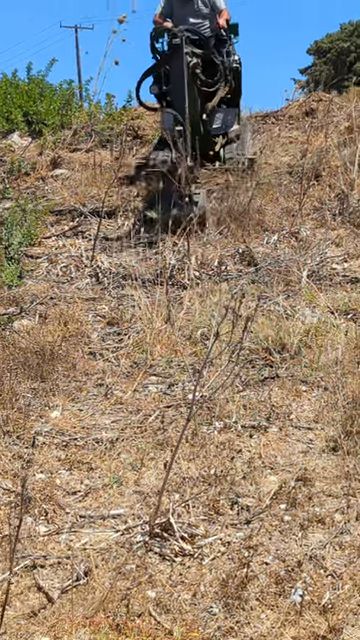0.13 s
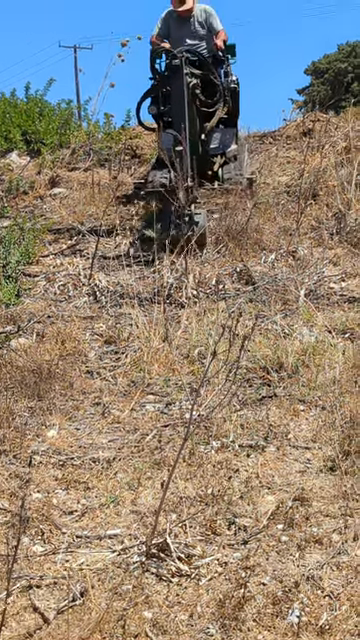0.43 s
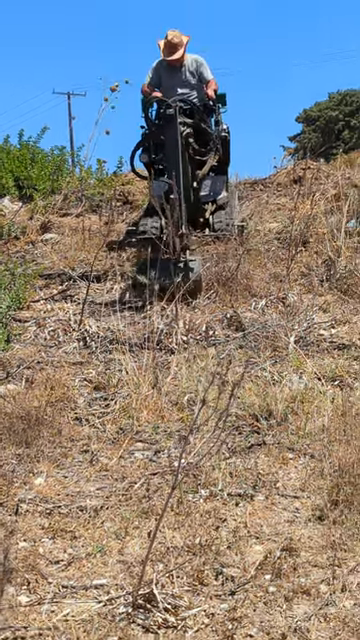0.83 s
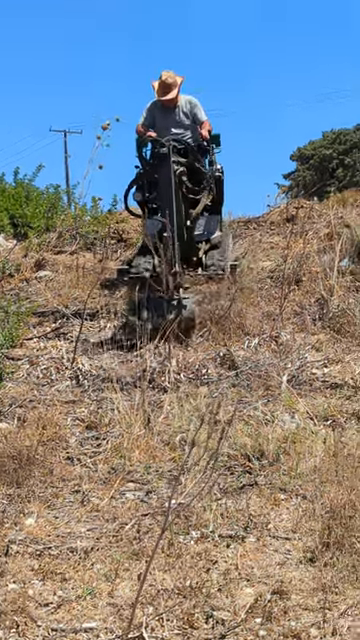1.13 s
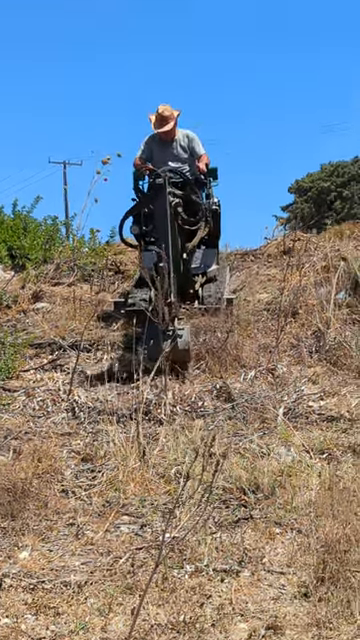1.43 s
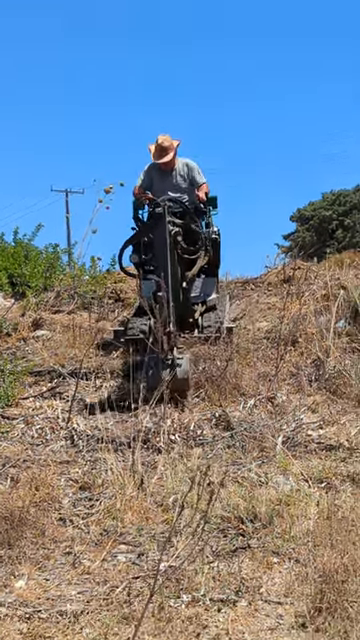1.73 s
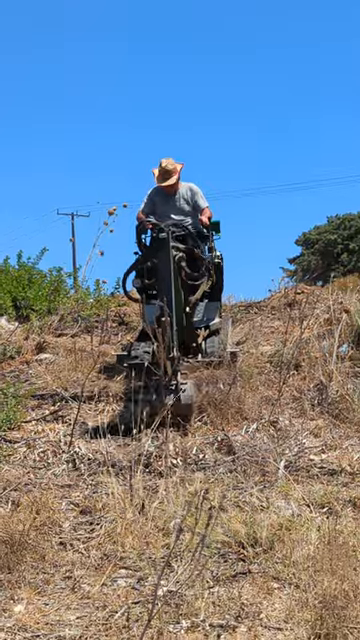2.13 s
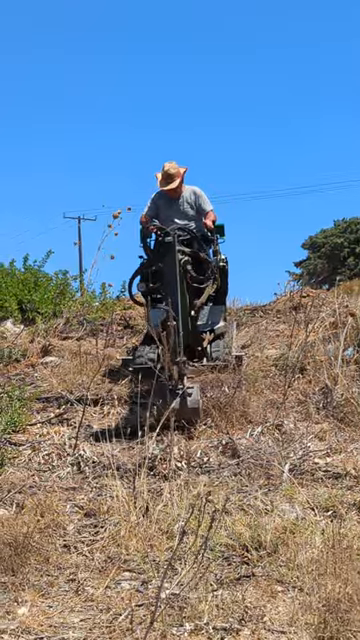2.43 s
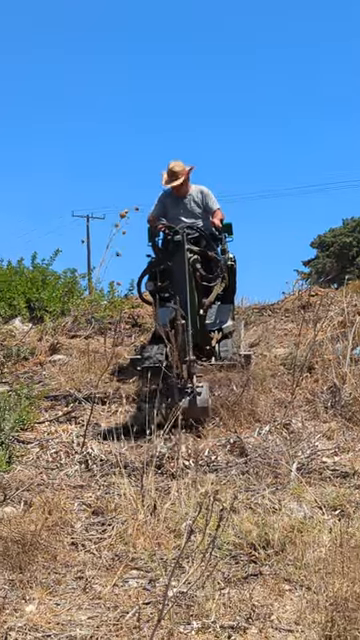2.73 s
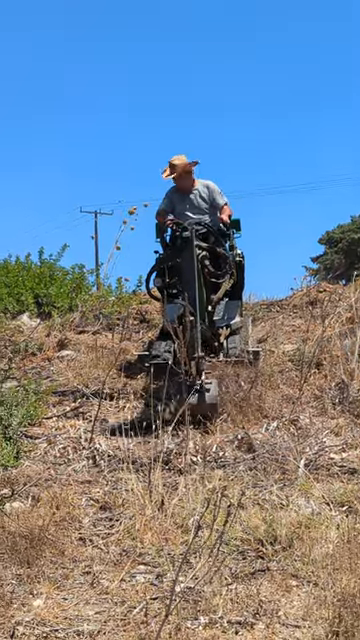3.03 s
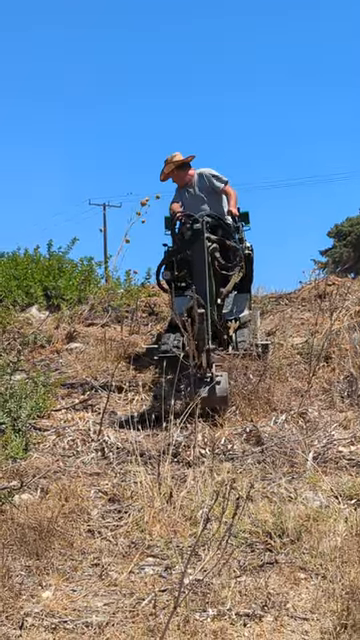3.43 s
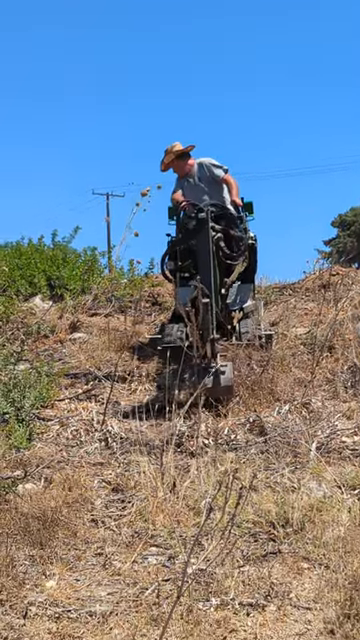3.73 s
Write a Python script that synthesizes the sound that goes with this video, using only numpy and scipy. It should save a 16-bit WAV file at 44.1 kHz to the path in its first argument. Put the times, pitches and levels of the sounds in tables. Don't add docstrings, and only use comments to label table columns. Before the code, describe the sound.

Small digger engine idling with uneven thuds and clatter, under heavy bumps of wind.

```python
import sys
import numpy as np
from scipy import signal
from scipy.fft import rfft, irfft, next_fast_len
from scipy.io import wavfile
from scipy.ndimage import uniform_filter1d, map_coordinates

SR = 44100
rng = np.random.default_rng(int(sys.argv[2]) if len(sys.argv) > 2 else 0)


def to_wav(s):
    ch = np.atleast_2d(s).T
    pcm = np.round(np.clip(ch, -1, 1) * 32767)
    wavfile.write(sys.argv[1], SR, pcm.astype(np.int16))


def decibels_to_gain(level_db):
    exponent = np.asarray(level_db, float) / 20
    return 10 ** exponent


N = 171990
TIME = np.arange(N) / SR


def unit(x):
    return x / np.sqrt(np.mean(x ** 2, axis=-1, keepdims=True) + 1e-20)


def along(points, hz):
    f, v = np.transpose(points)
    return np.interp(np.log(hz + 1), np.log(f + 1), v)


def curve(rows):
    s, v = np.transpose(rows)
    return np.interp(TIME, s, v)


def wobble(rate):
    knots = rng.standard_normal(int(N * rate / SR) + 4)
    return map_coordinates(knots, [np.arange(N) * rate / SR])


def filtered(x, response):
    n = x.shape[-1]
    m = next_fast_len(n + 8192)
    return irfft(rfft(x, m) * response(np.fft.rfftfreq(m, 1 / SR)), m)[..., :n]


# centre_hz, width_hz, level_db over the rest
PANELS = [(1130, 160, 6), (1500, 150, -4), (2090, 80, 5), (2250, 60, 4), (2810, 40, 4), (3750, 80, 8),
          (4220, 250, 4), (4640, 130, 10), (4970, 90, -5), (5600, 200, -6), (6090, 200, 3),
          (6650, 350, -3.5), (7330, 400, 1.5), (8100, 400, -2), (8780, 200, 4), (9150, 200, 2),
          (9520, 300, -4.5), (9950, 150, 2), (10400, 120, 3), (10950, 150, -3), (12300, 700, 4)]


def ridged(points):
    def gain(hz):
        ridges = sum(db / (1 + (2 * (hz - centre) / width) ** 2) for centre, width, db in PANELS)
        return decibels_to_gain(along(points, hz) + ridges)
    return gain


# freq_hz, likeness (0-1)
ALIKE = [(300, .97), (900, .93), (1400, .85), (2200, .93), (4500, .8), (6000, .4), (7000, .3), (14000, .3)]


def rush(gain, patchy_db):
    z = signal.stft(rng.standard_normal((2, N)), nperseg=512)[2]
    field = uniform_filter1d(rng.standard_normal(z.shape[1:]), size=6, axis=0)
    field = uniform_filter1d(field, size=10, axis=1)
    patches = decibels_to_gain(patchy_db * field / field.std())
    pair = signal.istft(z * patches, nperseg=512)[1][:, :N]

    def mid_side_gain(hz):
        turn = np.arccos(np.clip(along(ALIKE, hz), -1, 1)) / 2
        return gain(hz) * [np.cos(turn), np.sin(turn)]
    mid, side = filtered(pair, mid_side_gain)
    return unit(np.array([mid + side, mid - side]))


# time_s, cycles_hz
SPEED = [(.24, 25.23), (.71, 25.33), (1.19, 25.35), (1.66, 25.45), (2.13, 25.34), (2.6, 25.33),
         (3.08, 25.2), (3.56, 25.16)]
FIRST_S, WAVER = .0105, .006


def crank():
    return np.cumsum(curve(SPEED)) / SR - FIRST_S * SPEED[0][1] + WAVER * wobble(7.3)


# centre_hz, width_hz, level_db
PIPE = [(136.6, 32.2, 9), (227.3, 32.4, 0.5), (284, 16, -17.5), (384, 21, -24), (480, 210, -22.5),
        (785, 500, -22)]
SECOND_AT, SECOND_DB = 0.2163, -0.5
JITTER_S, SCATTER_DB, EXHAUST_DB = .00007, 1.4, 13.5


def exhaust(turns):
    whole = np.arange(int(turns[-1]) + 1)
    pulses = np.zeros(N)
    for at, db in [(0, 0), (SECOND_AT, SECOND_DB)]:
        late, strength = rng.standard_normal((2, len(whole)))
        place = np.interp(whole + at, turns, np.arange(N)) + JITTER_S * SR * late
        low = np.clip(place.astype(int), 0, N - 2)
        size = -decibels_to_gain(db + SCATTER_DB * strength)
        np.add.at(pulses, low, size * (1 - place % 1))
        np.add.at(pulses, low + 1, size * (place % 1))

    def pipe(hz):
        ring = 0
        for k, (centre, width, db) in enumerate(PIPE):
            mode = 1j * hz * width / (centre ** 2 - hz ** 2 + 1j * hz * width)
            ring = ring + (-1) ** k * decibels_to_gain(db) * mode
        return ring / (1 + 1j * hz / 1400) ** 2
    return decibels_to_gain(EXHAUST_DB) * unit(filtered(pulses, pipe))


# crank_multiple, level_db over the load
ORDER_LINES = [(2, -3.5), (3, -3), (18, -10.5), (21, -8), (26, -11.5), (29, -10.5), (30, -10), (34, -17),
               (36, -14)]
ORDERS_AT, HIGH_ORDERS_AT = 0.047, .12
ORDER_DRIFT = .017


def crank_orders(turns):
    hum = np.zeros(N)
    for k, db in ORDER_LINES:
        sign, at = (1, ORDERS_AT) if k < 4 else (-1, HIGH_ORDERS_AT)
        level = sign * np.sqrt(2) * decibels_to_gain(db + 1.5 * wobble(5.64))
        phase = 2 * np.pi * round(k) * (turns - at) + ORDER_DRIFT * k * wobble(9)
        hum += level * np.cos(phase)
    return hum


KNOCK_AT, KNOCK_DB, KNOCK_SCATTER_DB = .105, -6.5, 3
KNOCK_HZ, KNOCK_WIDE_HZ = 620, 400


def knock(turns):
    whole = np.arange(int(turns[-1]) + 1)
    place = np.interp(whole + KNOCK_AT, turns, np.arange(N)).astype(int)
    blows = np.zeros(N)
    blows[place] = decibels_to_gain(KNOCK_SCATTER_DB * rng.standard_normal(len(whole)))

    def block(hz):
        return (1j * hz * KNOCK_WIDE_HZ / (KNOCK_HZ ** 2 - hz ** 2 + 1j * hz * KNOCK_WIDE_HZ)) ** 2
    return decibels_to_gain(KNOCK_DB) * unit(filtered(blows, block))


# freq_hz, density_db per Hz
RUSH = [(180, -30), (300, 1.5), (378, -23.5), (529, -11), (580, -11), (746, -6.5), (828, -11.5),
        (1600, -14.5), (2080, -18.5), (3520, -120)]
RUSH_DB, RUSH_GATE_DB, GATE_AT = 0.5, 0, 0.12


def exhaust_rush(turns):
    swell = np.cos(2 * np.pi * (turns - GATE_AT))
    return decibels_to_gain(RUSH_DB + RUSH_GATE_DB * swell) * rush(ridged(RUSH), patchy_db=0.4)


# freq_hz, density_db per Hz
CASING = [(820, 3.5), (1400, -30), (1530, -8), (2070, 2), (2620, -6), (4240, -5.5), (5090, -15.5),
          (6000, -17), (7800, -26), (13200, -120)]
CASING_DB, CASING_GATE_DB = -1.5, 2.5
CLATTER_FALL = .35


def casing(turns):
    clatter = 3 * uniform_filter1d(np.exp(-(turns % 1) / CLATTER_FALL), size=150) - 1
    level_db = CASING_DB + CASING_GATE_DB * clatter + 0.81 * wobble(18)
    return decibels_to_gain(level_db) * rush(ridged(CASING), patchy_db=1.1)


# time_s, level_db
LOAD = [(0.0, -36.5), (3.51, -35), (3.9, -35)]
EXHAUST_PAN_DB, PAN_BELOW_HZ = -5, 350


def engine():
    turns = crank()
    thud = exhaust(turns) + crank_orders(turns) + knock(turns)
    sides = np.array([[.5], [-.5]])
    thud = filtered(thud, lambda hz: decibels_to_gain(EXHAUST_PAN_DB * sides / (1 + (hz / PAN_BELOW_HZ) ** 4)))
    return decibels_to_gain(curve(LOAD)) * (thud + exhaust_rush(turns) + casing(turns))


# freq_hz, density_db per Hz
HISS = [(2940, 1), (5000, -31), (5660, -27), (6170, -2.5), (7990, -2.5), (10800, 11.5), (12100, 6),
        (13700, -13), (15700, -49)]
HISS_DB, HISS_WOBBLE_DB, HISS_PATCH_DB = -41.5, 1.15, 1.6
ROTOR_HZ, ROTOR_DEPTH = 148.3, 0.07


def rotor():
    flutter = 1 + ROTOR_DEPTH * np.sin(2 * np.pi * ROTOR_HZ * TIME + 0.66 * wobble(3.8))
    return decibels_to_gain(HISS_DB + HISS_WOBBLE_DB * wobble(12)) * flutter * rush(ridged(HISS), HISS_PATCH_DB)


# time_s, level_db
BREEZE = [(0, -26.5), (.15, -19), (.3, -25), (.5, -26), (.66, -26), (1.1, -23.5), (1.4, -22), (1.6, -26.5),
          (2.15, -26), (2.5, -23.5), (2.87, -24), (3.3, -23.5), (3.6, -25.5), (3.9, -30)]
# freq_hz, density_db per Hz
RUMBLE = [(25, -12.5), (60, -3), (110, -4.5), (200, -8.5), (350, -51), (600, -46), (6000, -51.5),
          (15000, -46), (15700, -46)]


def breeze():
    rumble = unit(filtered(rng.standard_normal((2, N)), lambda hz: decibels_to_gain(along(RUMBLE, hz))))
    return rumble * decibels_to_gain(curve(BREEZE) + 1.4 * wobble(17))


# start_s (centre), length_s, level_db, brightness_db
GUSTS = [(0.087, 0.028, -11.5, -7), (0.136, 0.027, -8.5, -14), (0.21, 0.03, -13, -7),
         (0.413, 0.033, -9.5, -12.5), (0.491, 0.02, -9.5, -17), (0.573, 0.013, -15, -8.5),
         (0.76, 0.022, -9.5, -11.5), (0.904, 0.025, -10.5, -17.5), (0.972, 0.023, -11.5, -32),
         (1.084, 0.024, -8.5, -12.5), (1.121, 0.02, -13, -12), (1.25, 0.035, -13.5, -12.5),
         (1.408, 0.018, -11.5, -28), (1.511, 0.051, -15.5, -12.5), (1.548, 0.0078, -8.5, -17),
         (1.59, 0.025, -10.5, -12), (1.649, 0.023, -11.5, -5), (1.762, 0.033, -19, -15),
         (1.875, 0.021, -10, -20), (1.948, 0.023, -10.5, -14.5), (2.031, 0.057, -18.5, -22),
         (2.272, 0.031, -14.5, -6), (2.47, 0.036, -14, -15), (2.546, 0.037, -9.5, -9.5),
         (2.76, 0.033, -9, -9), (2.969, 0.019, -16, -11), (3.013, 0.015, -14.5, -10.5),
         (3.166, 0.017, -13.5, -10.5), (3.33, 0.011, -9.5, -16), (3.415, 0.022, -7.5, -17.5),
         (.445, 0.021, -12, -32), (0.839, 0.011, -18, -7.5), (1.04, 0.025, -11, -16),
         (1.17, 0.04, -17, -12), (1.22, 0.019, -15.5, -27), (1.286, 0.051, -14.5, -15),
         (2.112, 0.031, -22, -19), (2.379, 0.053, -22.5, -11), (2.691, 0.018, -14.5, -24),
         (3.116, .025, -19.5, -10), (3.228, 0.096, -23, -10), (3.372, 0.044, -17.5, -22),
         (3.501, 0.03, -20, -15), (3.651, 0.017, -22.5, -7), (3.701, 0.012, -12.5, -18),
         (.055, 0.0083, -15.5, -17), (0.607, 0.02, -20, -19)]
# freq_hz, density_db per Hz
DULL = [(40, -16), (80, -14.5), (130, 1.5), (220, -2.5), (320, -6), (450, -29.5), (700, -61.5)]
# freq_hz, density_db per Hz
BRIGHT = [(150, -81), (280, -16.5), (350, -2.5), (450, -5.5), (580, -12.5), (700, -17), (850, -79)]
EDDY_DB, STRETCH, BRIGHT_DB = 1.5, 0.93, 0


def eddies():
    span = SR // 5
    out = np.zeros((2, N + 2 * span))
    t = (np.arange(span) - span // 2) / SR

    def pressure(shape, points):
        noise = rng.standard_normal((2, span))
        return unit(shape * filtered(noise, lambda hz: decibels_to_gain(along(points, hz))))
    for s, length, db, bright_db in GUSTS:
        shape = np.exp(-np.log(4) * (t / (STRETCH * length)) ** 2)
        buffet = pressure(shape, DULL) + decibels_to_gain(bright_db + BRIGHT_DB) * pressure(shape, BRIGHT)
        level = decibels_to_gain(db + EDDY_DB) * np.sqrt(np.mean(shape ** 2))
        out[:, round(s * SR):][:, :span] += level * buffet
    return out[:, span // 2:span // 2 + N]


EDDY_PAN_DB = 2.8


def wind():
    return (eddies() + breeze()) * decibels_to_gain(EDDY_PAN_DB * np.array([[.5], [-.5]]))


# start_s, peak_db, t60_s, lowest_hz, highest_hz
SNAPS = [(.109, -33, .035, 8000, 13000), (.1145, -24, .045, 8000, 14500), (.116, -31, .04, 5600, 6400),
         (.874, -35, .035, 5750, 6350), (.9825, -30, .035, 4500, 11000), (.998, -33, .04, 3600, 5000),
         (1.33, -35, .04, 3500, 9000), (1.343, -33, .04, 3500, 10000), (1.96, -32, .02, 5800, 9000),
         (1.989, -23.5, .022, 5000, 14000), (2.031, -33, .02, 5500, 8500), (2.2154, -29, .025, 6500, 12000),
         (2.228, -28, .022, 11000, 15500), (2.229, -34, .03, 5500, 8000), (2.92, -34, .04, 5000, 12000),
         (3.2368, -23, .03, 7200, 15000), (3.245, -32, .04, 5500, 15000), (3.256, -31, .03, 5200, 13000)]
SNAP_RISE_S = .002


def stalks():
    out = np.zeros((2, N + SR))
    t = np.arange(SR // 10) / SR
    for s, db, t60, low_hz, top_hz in SNAPS:
        a, b = rng.standard_normal((2, len(t)))
        noise = np.array([a + .5 * b, a - .5 * b])
        band = lambda hz: 1 / (1 + (low_hz / (hz + 1)) ** 12) / (1 + (hz / top_hz) ** 12)
        fade = decibels_to_gain(db - 60 * t / t60) * (1 - np.exp(-t / SNAP_RISE_S))
        out[:, round(s * SR):][:, :len(t)] += fade * unit(filtered(noise, band))
    return out[:, :N]


# start_s (centre), length_s, level_db over the load
SCRAPES = [
    (0.968, .008, -5),
    (1.045, .01, 0.5),
    (1.081, .006, -3),
    (1.174, .015, -3),
    (1.203, 0.011, 1),
    (1.234, 0.011, 1),
    (1.351, 0.015, 3.5),
    (2.308, .03, -1),
    (2.551, .02, 1),
]
# freq_hz, density_db per Hz
BRUSH = [(900, -38), (1500, -8), (2100, 0.5), (2400, -10.5), (3000, -30), (6000, -60)]


def scrapes():
    strokes = sum(decibels_to_gain(db) * np.exp(-((TIME - s) / length) ** 2) for s, length, db in SCRAPES)
    return decibels_to_gain(curve(LOAD)) * strokes * rush(ridged(BRUSH), patchy_db=-0.7)


LAG_S = .00015


def lagged(pair):
    sides = np.array([[1], [-1]])
    return filtered(pair, lambda hz: np.exp(1j * np.pi * hz * LAG_S * sides))


def scene():
    return lagged(engine() + rotor() + stalks() + scrapes()) + wind()


def low_pass(x):
    return signal.sosfilt(signal.butter(12, 15830, fs=SR, output="sos"), x)


DUCK_S, DUCK_DB, DUCK_RECOVER_S = 2.755, -5, .06
LEFT_DB, LOW_CUT_HZ, TOP_HZ, CEILING = .5, 44, 15830, .97
SHELF_HZ, SHELF_DB, SHELF_STEEP = 13300, -6.5, 30


def record(dry):
    since = TIME - DUCK_S
    ducked = dry * decibels_to_gain(DUCK_DB * (since > 0) * np.exp(-(since / DUCK_RECOVER_S) ** 2))
    cut = filtered(ducked, lambda hz: (1j * hz / (LOW_CUT_HZ + 1j * hz)) ** 2) * decibels_to_gain([[LEFT_DB], [0]])
    clipped = cut / (1 + np.abs(cut / CEILING) ** 10) ** (1 / 10)

    def dull_top(hz):
        below = ((SHELF_HZ + 1e3) / (hz + 1e3)) ** SHELF_STEEP
        return (hz < TOP_HZ) * decibels_to_gain(SHELF_DB / (1 + below))
    return low_pass(filtered(clipped, dull_top))


dry = scene()
out = record(dry)
to_wav(out)
```